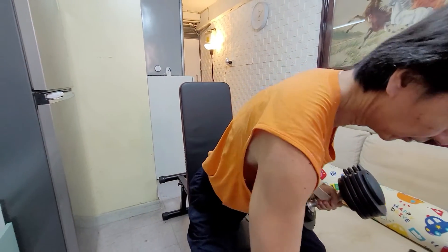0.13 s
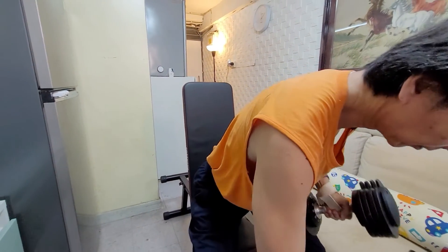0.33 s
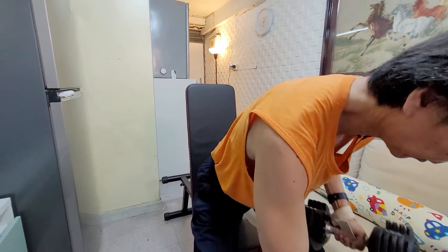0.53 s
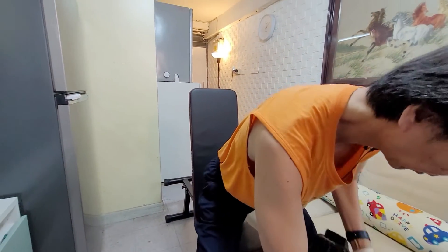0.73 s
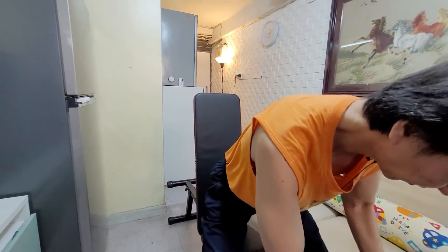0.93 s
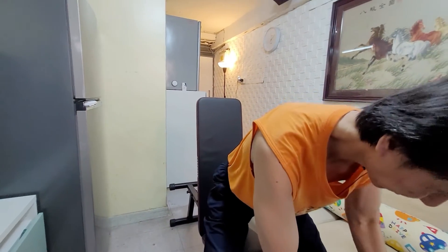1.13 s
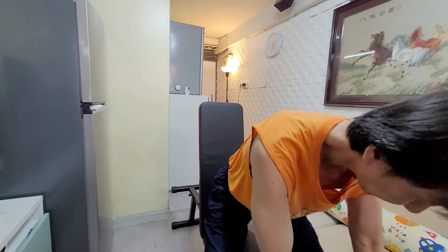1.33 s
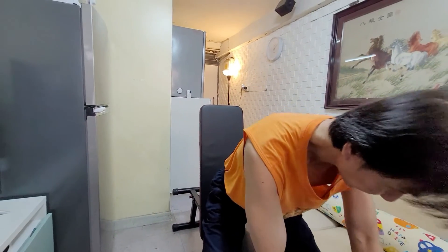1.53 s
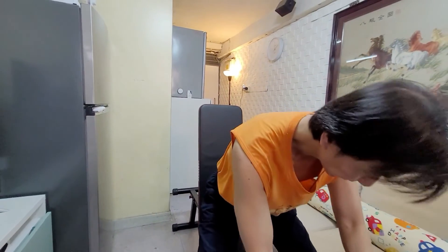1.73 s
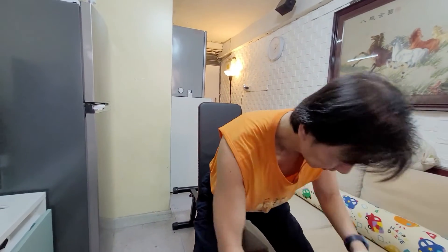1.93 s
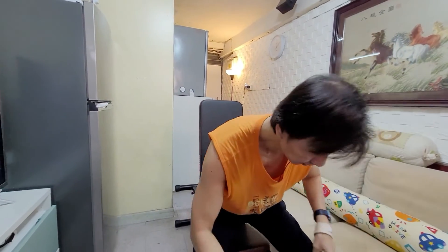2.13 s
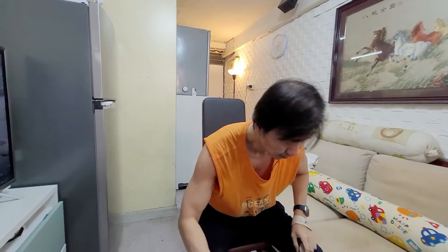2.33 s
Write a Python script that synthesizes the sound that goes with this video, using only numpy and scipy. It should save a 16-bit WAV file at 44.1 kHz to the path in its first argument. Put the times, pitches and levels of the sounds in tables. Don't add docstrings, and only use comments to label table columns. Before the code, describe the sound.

A heavy dumbbell hits a hard floor at about 0.2 s, with a low thump, rattling plates and a smaller bounce at 0.33 s. Light hollow plastic knocks and tiny ticks follow from 0.85 to 1.3 s. At 1.4 s a second dumbbell thuds down with a bright, brief steel clink. Faint knocks and cloth rustle trail to 2.4 s over quiet room hum, with short indoor reverberation.

```python
import sys
import numpy as np
from scipy import signal
from scipy.fft import rfft, irfft
from scipy.io import wavfile
from scipy.ndimage import uniform_filter1d

SR = 44100
rng = np.random.default_rng(int(sys.argv[2]) if len(sys.argv) > 2 else 0)


def inscribe(sig):
    pcm = np.round(np.clip(np.atleast_2d(sig).T, -1, 1) * 32767)
    wavfile.write(sys.argv[1], SR, pcm.astype(np.int16))


def ratio(d):
    e = np.asarray(d, float) / 20
    return 10 ** e


N = 110250

# t/s, force level/dB, drum mode f/Hz, splitting of the mode pair/Hz, slab level/dB
FIRST_LANDINGS = [(.086, -42.5, 295, 10, 1.5), (.139, -40, 293, 10, -3), (.156, -37.5, 302, 11, -2),
                  (.178, -40.5, 339, 9, 6.5), (.2078, -2.5, 307, 20.3, -3), (.2365, -27, 275, 8.1, -0.5),
                  (.263, -28.5, 265, 7.5, -2), (.3258, -11, 296.7, 2.7, -6), (.344, -24, 296, 5, -3),
                  (.357, -28, 297, 4.6, -10), (.4355, -32, 291, 9.5, -1.5), (.54, -48, 320, 11, 1.5)]
SECOND_LANDINGS = [
    (1.3961, -3.5, 317, 26, -1),
    (1.4062, -19, 297, 11, -2),
    (1.4188, -19.5, 294, 10, 0.5),
    (1.483, -36.5, 308, 8.8, 11),
    (1.521, -36, 292, 12, 10),
    (1.838, -34, 253, 8.9, 2.5),
    (2.065, -50, 305, 10, 12),
    (2.301, -47, 290.4, 9, 8.5),
    (2.314, -46, 268, 10, 1.5),
]


def evened(x):
    return x / np.sqrt(np.mean(x ** 2) + 1e-20)


def read(points, hz):
    f, value = np.transpose(points)
    return np.interp(np.log(hz + 1), np.log(f + 1), value)


def add(mix, s, sound):
    part = mix[round(s * SR):][:len(sound)]
    part += sound[:len(part)]


def ring(modes, scale=1):
    t = np.arange(SR // 2) / SR
    hz, db, t60 = np.transpose(modes)[:, :, None]
    partials = ratio(db - 60 * t / t60) * np.sin(2 * np.pi * hz * scale * t)
    return partials.sum(0)


def burst(colour, t60, rise_s=0.00048):
    t = np.arange(8192) / SR
    gain = ratio(read(colour, np.fft.rfftfreq(8192, 1 / SR)))
    noise = irfft(rfft(rng.standard_normal(8192)) * gain)
    return evened(noise) * np.minimum(t / rise_s, 1) * ratio(-60 * t / t60)


def chatter(length_s, first_db, linger):
    t = np.arange(2000) / SR
    envelope = np.exp(-(t / length_s) ** 2) + linger * (1 - t / t.max())
    impacts = rng.standard_normal(2000) ** 3 * envelope
    return impacts / np.linalg.norm(impacts) + ratio(first_db) * (t == 0)


def pair(size):
    # f/Hz, coherence between the microphones
    coherence = [(30, .75), (130, .93), (300, .95), (640, .5), (1400, .08), (15000, .0)]
    hz = np.fft.rfftfreq(size, 1 / SR)
    a, b = rfft(rng.standard_normal((2, size)))
    same = np.clip(read(coherence, hz), -1, 1)
    return hz, np.array([a, same * a + np.sqrt(1 - same ** 2) * b])


def first_dumbbell():
    # f/Hz, level/dB, T60/s
    slab = [(395, -7, .045), (490, -13, .03), (598, -12, .04), (650, -15, .03), (705, -9, .045),
            (790, -13, .03), (850, -13, .03), (905, -6, .035), (985, -7, .035), (1080, -17, .03)]
    # f/Hz, level/dB, T60/s
    plate = [(1580, -4, .03), (2070, -12, .03), (2304, -2, .045), (2401, -2, .045), (2630, -8, .025),
             (2935, -5, .025), (3335, -5, .025), (3600, -12, .025), (3905, -9, .06), (4350, -13, .03),
             (4745, -14, .04), (4950, -16, .04), (5418, -11, .07), (6630, -20, .04)]
    # t/s, level/dB, clatter level/dB
    shakes = [
        (.209, -50, -21),
        (.218, -48, -34),
        (.238, -38.5, -30),
        (.3075, -43.5, -40),
        (.3125, -33.5, -45),
        (.318, -48, -49),
        (.327, -40.5, -39.5),
        (.345, -58, -40),
        (.431, -68, -46),
    ]
    # f/Hz, level/dB per Hz
    clatter = [(300, -16), (900, -5), (1500, -2), (2800, -11.5), (4000, -14), (7000, -19.5), (12000, -30),
               (16000, -27)]
    thump = floor(FIRST_LANDINGS, slab, push_gain=-1.14, t60=0.055)
    return thump + plates(shakes, plate, clatter, length_s=0.0013)


def second_dumbbell():
    # f/Hz, level/dB, T60/s
    slab = [(400, -9, .04), (490, -11, .03), (590, -7, .045), (645, -15, .03), (700, -12, .04),
            (765, -17, .03), (830, -17, .04), (964, -24, .035), (1663, -27, .03)]
    # f/Hz, level/dB, T60/s
    plate_one = [(3465, -8, .07), (4178, -5, .07), (4300, -6, .02), (4370, -6, .07), (4537, -8, .07),
                 (5254, -6, .09), (5840, -5, .1), (6903, -15, .09), (7443, -10, .16), (8140, -12, .1),
                 (9838, -22, .1), (10800, -20, .09), (11850, -13, .1), (13840, -29, .07)]
    plate_two = [(2105, -8, .07), (3285, -6, .06), (3570, -8, .06), (3940, -5, .06), (4115, -7, .05),
                 (4245, -6, .05), (4880, -11, .06), (5705, -9, .07), (6350, -17, .05), (7560, -11, .05),
                 (8330, -10, .06), (9200, -18, .07), (11150, -16, .07), (13150, -27, .08)]
    # t/s, level/dB, clatter level/dB
    shakes_one = [
        (1.399, -65.5, -44),
        (1.4272, -27, -22.5),
        (1.434, -43.5, -39),
        (1.445, -41.5, -32.5),
        (1.466, -45, -37.5),
        (1.515, -58, -51),
    ]
    shakes_two = [
        (1.4258, -47, -35),
        (1.4276, -36.5, -31),
        (1.435, -33.5, -33.5),
        (1.449, -41.5, -42),
        (1.481, -46.5, -42.5),
    ]
    # f/Hz, level/dB per Hz
    clatter = [(500, -34), (1200, -5.5), (2400, -1.5), (4300, -9.5), (6000, -11), (7000, -28), (15000, -36),
               (16000, -49.5)]
    thump = floor(SECOND_LANDINGS, slab, push_gain=0.86, t60=0.047)
    clink_one = plates(shakes_one, plate_one, clatter, length_s=0.0012)
    clink_two = plates(shakes_two, plate_two, clatter, length_s=0.0012)
    return thump + clink_one + clink_two


def floor(landings, slab, push_gain, t60):
    # f/Hz, level/dB per Hz
    slap = [(300, -15), (500, -7.5), (900, -6), (1500, -2.5), (2500, -12.5), (4000, -22), (7000, -19),
            (16000, -35)]
    contact_s, build_s = 0.00096, 0.00043
    slap_db, slap_t60 = -26, 0.11
    out, t = np.zeros(N), np.arange(SR // 2) / SR
    push = np.sin(np.pi * np.clip(t[:200] / contact_s, 0, 1))
    push = push / push.sum()
    for s, db, hz, split, slab_db in landings:
        beating = ring([(hz - split / 2, -6, t60), (hz + split / 2, -6, t60)])
        drum = beating * (1 - np.exp(-t / build_s))
        modes = drum + ratio(slab_db) * ring(slab)
        add(out, s, push_gain * ratio(db) * np.convolve(modes, push))
        add(out, s, ratio(db + slap_db) * burst(slap, slap_t60))
    return out


def plates(shakes, modes, colour, length_s):
    out = np.zeros(N)
    for s, db, clatter_db in shakes:
        twin_ratio = 1.02 + 0.012 * rng.standard_normal()
        body = ring(modes) + 0.05 * ring(modes, twin_ratio)
        contacts = chatter(length_s, first_db=4, linger=0.09)
        add(out, s, ratio(db) * signal.fftconvolve(body, contacts))
        add(out, s, ratio(clatter_db) * burst(colour, t60=0.06))
    return out


def housing():
    # f/Hz, level/dB, T60/s
    shell = [(490, -5, .025), (533, -2, .025), (640, -4, .022), (725, -3, .022), (850, -7, .022),
             (960, -4, .018), (1062, -2, .02), (1150, -6, .018), (1760, -8, .025), (2050, -9, .025),
             (2230, -9, .025), (2550, -18, .02), (4950, -20, .025)]
    # t/s, body level/dB, rattle level/dB, frequency factor
    knocks = [(.086, -48.5, -71, 0.94), (.095, -43, -69, 0.59), (0.136, -47, -54.5, 0.63),
              (.177, -42.5, -71, 0.68), (.535, -62.5, -54.5, 1.55), (.855, -35.5, -37, 0.99),
              (1.025, -35, -41, 1.03), (1.09, -60.5, -52.5, 1.1), (1.229, -41.5, -47.5, 1.02),
              (1.295, -60, -68, 1.2), (1.335, -51.5, -65, 0.84), (1.515, -37.5, -43, 1.6),
              (1.62, -45, -48.5, 1.2), (1.641, -44, -49, 1.05), (1.788, -50, -61, 1.025),
              (1.842, -46, -67, 0.82), (1.918, -48, -48.5, 1.53), (2.064, -53, -63, .75),
              (2.299, -69, -68.5, 1.4), (2.317, -64, -78, 0.58), (2.49, -57.5, -76.5, 1)]
    # f/Hz, level/dB per Hz
    rattle = [(300, -34), (650, 7), (1100, 7), (2300, 8), (3200, -19.5), (6000, -5.5), (11000, -20),
              (16000, -17)]
    out = np.zeros(N)
    for s, db, rattle_db, scale in knocks:
        shudder = chatter(0.013, first_db=-4.5, linger=0.36)
        add(out, s, ratio(db) * signal.fftconvolve(ring(shell, scale), shudder))
        add(out, s, ratio(rattle_db) * burst(rattle, t60=0.079, rise_s=0.00025))
    return signal.lfilter(*signal.butter(2, 420, "high", fs=SR), out)


def latch():
    # t/s, level/dB, frequency factor
    ticks = [
        (1.0883, -49, 1.03),
        (1.132, -66.5, 1.1),
        (1.1594, -49.5, 0.94),
        (1.196, -56, 1),
        (1.294, -57, 1.2),
        (0.939, -56, 1.22),
        (.969, -68, 1),
    ]
    # f/Hz, level/dB, T60/s
    latch_modes = [(1440, 2, 0.034), (3615, -0.5, 0.0078), (4570, -8.5, 0.0053)]
    out = np.zeros(N)
    for s, db, scale in ticks:
        add(out, s, ratio(db) * ring(latch_modes, scale))
    return out


def cloth():
    # t/s, rustle level/dB
    movement = [(0, -105), (0.091, -82), (0.139, -53.5), (.2, -57), (.55, -62), (.68, -67), (.84, -68),
                (.95, -59), (1.35, -58.5), (1.6, -51.5), (1.75, -55.5), (1.801, -63.5), (1.86, -55),
                (1.93, -51.5), (2.0, -57), (2.101, -53.5), (2.163, -66), (2.5, -70.5)]
    # f/Hz, level/dB per Hz
    fibres = [(40, -5.5), (110, 0.5), (300, -2.5), (600, -17), (1300, -14), (3800, -19), (8000, -26),
              (16000, -31.5)]

    def swing(db, width):
        slow = uniform_filter1d(uniform_filter1d(rng.standard_normal(N), width), width)
        return ratio(db * evened(slow))

    hz, z = pair(N)
    rustle = evened(irfft(z * ratio(read(fibres, hz)), N))
    flicker = swing(1.2, 200)
    clumps = swing(1.5, 900)
    t, db = np.transpose(movement)
    return rustle * flicker * clumps * ratio(np.interp(np.arange(N) / SR, t, db))


def early(x):
    taps = np.zeros((2, 1500))
    at = (40 + 0.015 * SR * rng.random((2, 8))).astype(int).clip(0, 1499)
    strength = rng.choice([-1., 1.], at.shape) * ratio(-9 * at / 700)
    np.put_along_axis(taps, at, strength, 1)
    bright = signal.lfilter(*signal.butter(1, 700, "high", fs=SR), x)
    return ratio(-6.5) * signal.fftconvolve(bright[None], taps, axes=1)[:, :N]


def boom():
    out, t = np.zeros(N), np.arange(SR // 2) / SR
    swell = 1 - np.exp(-t / 0.012)
    for s, db, *_ in FIRST_LANDINGS + SECOND_LANDINGS:
        add(out, s, ratio(db) * ring([(74.8, -30, 0.33), (128, -32, .15)]) * swell)
    return out


def room(x):
    # f/Hz, T60/s
    decay = [(60, 0.82), (300, 0.12), (1000, 0.3), (4000, 0.18), (12000, 0.33)]
    x = x - 0.71 * signal.lfilter(*signal.butter(1, 450, fs=SR), x)
    noise = irfft(pair(SR // 2)[1], SR // 2)
    hz, t, z = signal.stft(noise, SR, nperseg=256)
    tail = signal.istft(z * ratio(-60 * t / read(decay, hz)[:, None]), SR, nperseg=256)[1]
    tail = tail * np.clip((np.arange(tail.shape[1]) / SR - .003) / 0.016, 0, 1)
    tail = tail / np.linalg.norm(tail[0])
    return ratio(-7.5) * signal.fftconvolve(x[None], tail, axes=1)[:, :N]


def hum():
    # f/Hz, level/dB per Hz
    air = [(12, -46.5), (20, -4.5), (110, -3), (310, 1.5), (513, -4.5), (802, -10), (1370, -27),
           (11400, -29), (16000, -29)]
    hz, z = pair(N)
    lumps = ratio(1.5 * evened(uniform_filter1d(rng.standard_normal(N), 2500)))
    level_db = -59.5 - 2.5 * (np.arange(N) < 0.09 * SR)
    return ratio(level_db) * lumps * evened(irfft(z * ratio(read(air, hz)), N))


def scene():
    x = first_dumbbell() + second_dumbbell() + housing() + latch()
    x = signal.lfilter(*signal.butter(2, 213, "high", fs=SR), x)
    near = x + boom()
    lag_s, left_db = 0.00023, -3
    left = ratio(left_db) * np.roll(near, round(lag_s * SR))
    direct = np.array([left, near])
    return direct + early(x) + room(x) + cloth() + hum()


def band_limit(x):
    return signal.sosfilt(signal.butter(12, 16470, fs=SR, output="sos"), x)


def record(dry):
    limited = 1.482 * np.tanh(dry / 1.116)
    edge = signal.firwin(101, 15600, fs=SR)
    edged = signal.oaconvolve(limited, edge[None], "same")
    return band_limit(edged)


dry = scene()
out = record(dry)
inscribe(out)
```